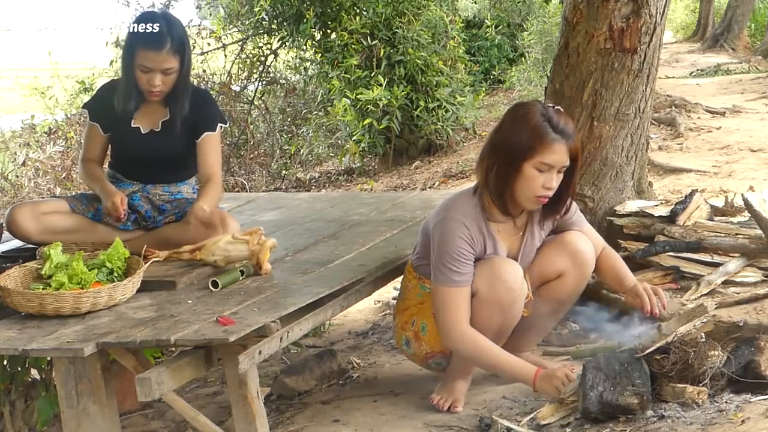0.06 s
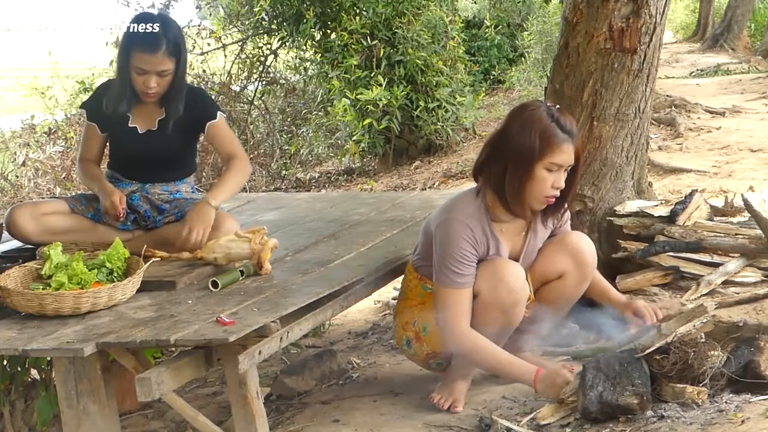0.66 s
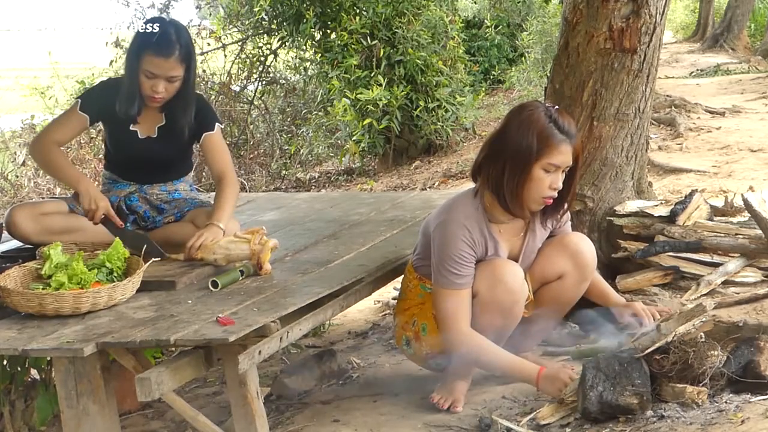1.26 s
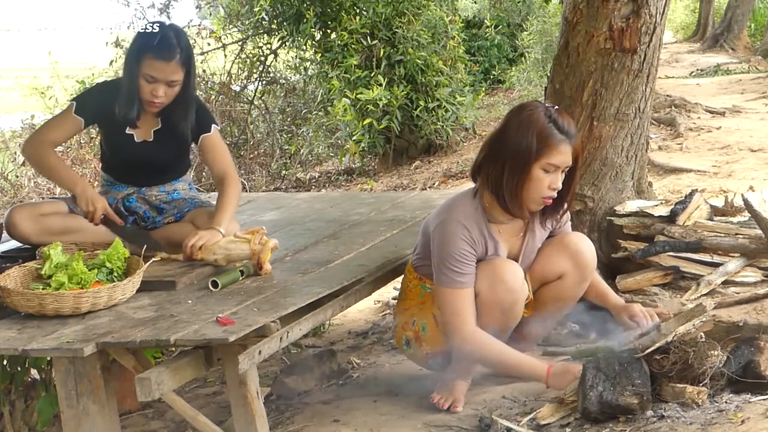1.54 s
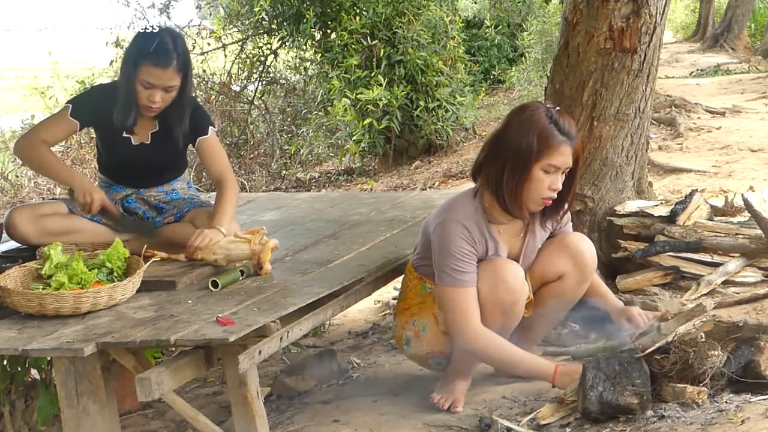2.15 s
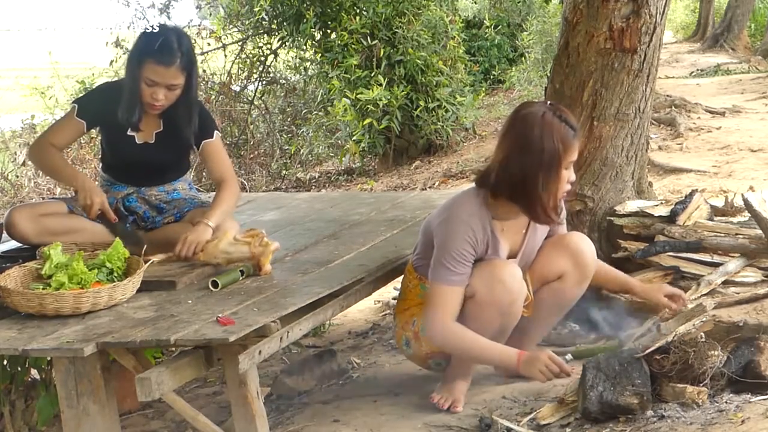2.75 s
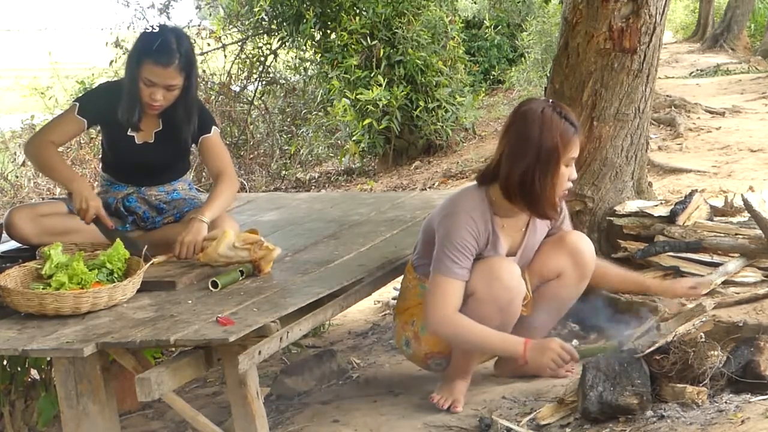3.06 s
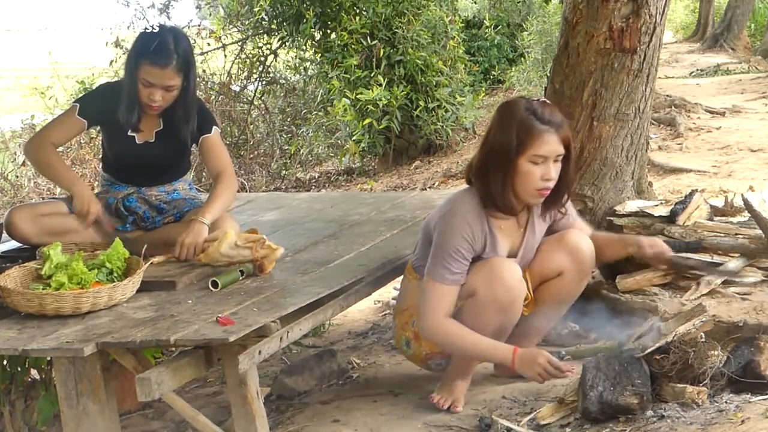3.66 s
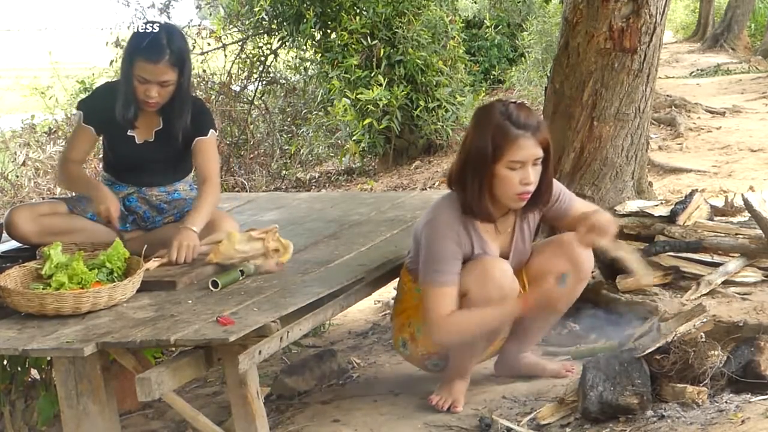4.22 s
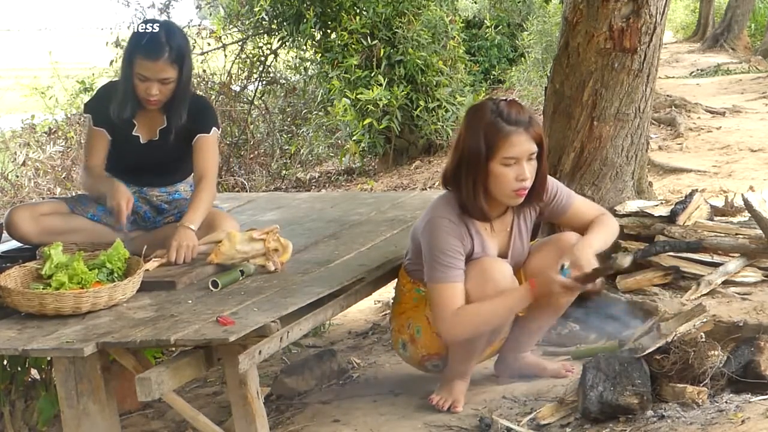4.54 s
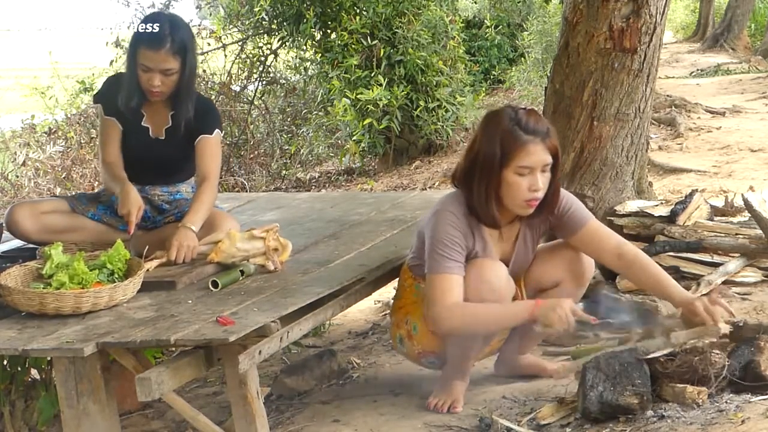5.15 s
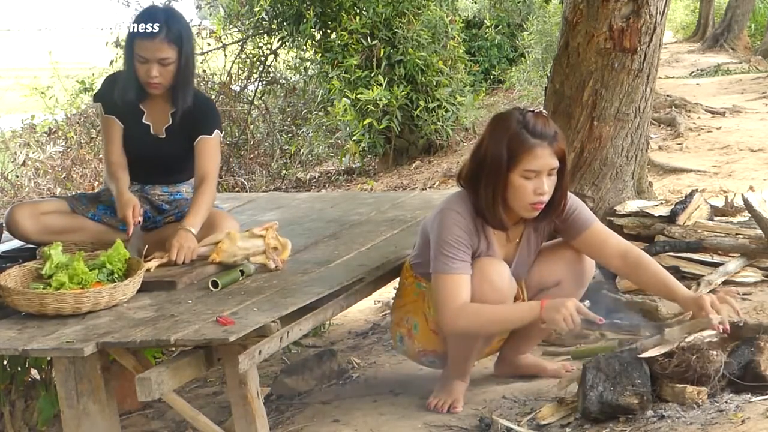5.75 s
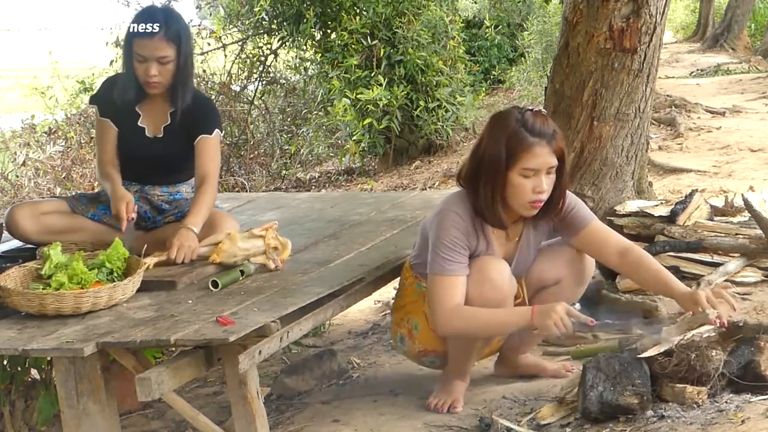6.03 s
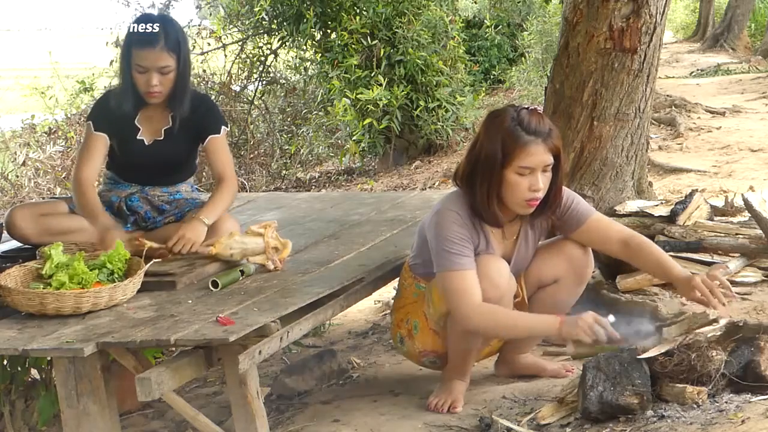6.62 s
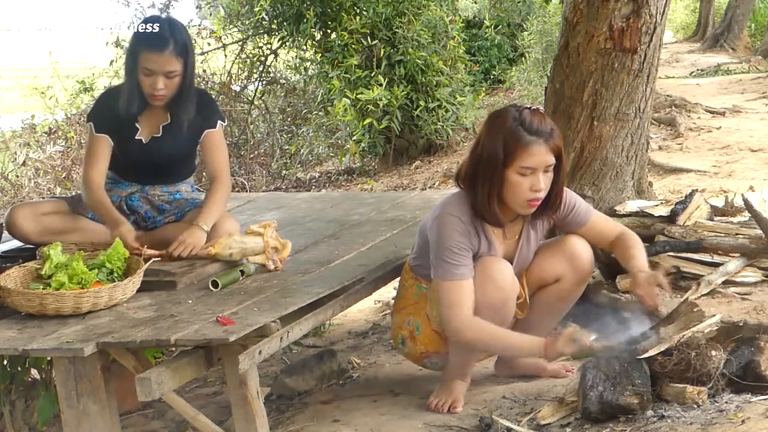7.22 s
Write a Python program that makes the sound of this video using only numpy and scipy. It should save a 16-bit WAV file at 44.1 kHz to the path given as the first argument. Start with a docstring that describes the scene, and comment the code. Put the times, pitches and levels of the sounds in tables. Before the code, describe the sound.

A soft outdoor hiss of leaves runs throughout, with faint insects and small birds chirping far off. Close by, a knife taps lightly on a plank table during the first two seconds, among a few faint scrapes of wood. A hard chop lands at 2 seconds: a steel tick, a wooden thump and rattle, and a short echo. Quick pairs of knocks follow between 3.1 and 3.4 seconds, then another hard chop at 3.7. From about 3.8 to 7 seconds, firewood is dragged and pushed over dry ground in quiet, gritty strokes. A dry stick snaps loudly at 4.3 seconds, with smaller snaps scattered afterwards. The knife strikes hard again at 4.8 seconds and knocks lightly around 5.9. At about 6.6 seconds it is laid down on the wood with a clatter and a brief steel ring, followed by one small knock.

```python
"""A heavy knife chops on a plank table outdoors: irregular knocks, some in quick pairs, then it is
laid down ringing. Each blow is a steel tick, a wooden thump and rattle, and a short echo off the trees.
Beside it firewood is dragged and pushed over dry ground in gritty strokes, and dry sticks snap.
Small birds chirp far off over a soft bed of leaf hiss and insects."""
import sys
import numpy as np
from scipy import signal
from scipy.fft import rfft, irfft, next_fast_len
from scipy.io import wavfile
from scipy.ndimage import uniform_filter1d

SR = 44100
rng = np.random.default_rng(int(sys.argv[2]) if len(sys.argv) > 2 else 0)


def log_audio(samples):
    """Write samples as a 16-bit WAV file to the path given in sys.argv[1]."""
    # one column per channel
    frames = np.atleast_2d(samples).T
    # limit to full scale, then quantise
    limited = np.clip(frames, -1, 1)
    pcm = np.round(limited * 32767).astype(np.int16)
    wavfile.write(sys.argv[1], SR, pcm)


N = 330309
TIME = np.arange(N) / SR
AGE = TIME[:SR // 2]  # time since the onset of a one-shot

# hiss of the leaves: (frequency [Hz], level [dB])
LEAF_HISS = [(20, -35), (45, -25.5), (80, -4.5), (130, -2), (290, -5.5), (450, 2), (600, -5), (1100, -6),
             (2000, -12.5), (3500, -12), (7500, -15.5), (10000, -12.5), (14000, -14), (16000, -19)]
# stereo width of that hiss: (frequency [Hz], side over mid [dB])
LEAF_WIDTH = [(60, -10.5), (150, 7), (400, 6.5), (1500, 2.5), (5000, -7.5), (12000, -4.5)]
# loudness curve of the insects: (time [s], level [dB])
INSECT_LEVELS = [(0, -74.5), (1.0, -71), (2.0, -67.5), (2.6, -86), (6.8, -70.5), (7.49, -70.5)]
# far birds: (time [s], length [s], first pitch [Hz], last pitch [Hz], arch [share of pitch], level [dB])
CHIRPS = [(0.307, 0.058, 3800, 3620, .02, -63), (1.672, 0.23, 3690, 4030, .015, -65.5),
          (2.228, 0.089, 3780, 3750, -.1, -64.5), (2.43, 0.078, 3620, 3120, -.03, -64),
          (2.548, 0.028, 3490, 3140, 0, -62.5), (2.692, 0.029, 3320, 3330, .06, -65),
          (2.81, .15, 3850, 4340, .03, -69), (3.047, 0.057, 3660, 3500, .04, -61),
          (3.169, 0.037, 3260, 3360, .07, -66), (3.22, .021, 3450, 3500, .09, -57.5),
          (3.28, 0.1, 4420, 4200, .04, -64), (3.6, 0.14, 2740, 3430, .01, -68),
          (3.903, 0.13, 3550, 3580, -0.042, -59), (4.152, 0.098, 3490, 2360, -.02, -59),
          (4.992, 0.064, 3100, 2940, .01, -59), (5.283, .22, 2380, 2154, -.04, -60.5),
          (7.23, 0.077, 3650, 3840, .05, -63), (7.365, 0.036, 3620, 2840, .03, -61)]

# knife blows: (time [s], level [dB], pitch of the struck spot [Hz], spot level [dB],
# second resonance [Hz], brightness [dB], steel contact [dB])
KNOCKS = [(.339, -48, 920, -20, 1296, -9, -16), (.742, -61, 1110, -17, 2200, 13, -17),
          (1.295, -48.5, 623, 3, 1180, -7, -19), (1.405, -59, 1072, 0, 2150, 7, -15),
          (1.662, -48, 1053, 2.5, 600, -12, -30), (1.9782, -12.5, 577, -2, 899, -1, -8),
          (3.086, -32.5, 378, 5.5, 653, -19, -8), (3.177, -33, 1121, 2.5, 220, -9, -38),
          (3.346, -21, 532, -3, 1056, -5, -4), (3.438, -29, 1097, 3, 487, -9.5, -38),
          (3.743, -13, 576, 0.5, 1654, 0, -11.5), (4.7951, -16, 920, 3.5, 1561, .5, -19),
          (5.163, -58, 890, 8, 1380, -4, -20), (5.248, -58, 527, 8, 2800, -16, -15),
          (5.614, -53, 455, 3.5, 746, -9, -20), (5.830, -45, 570, 1, 440, -6, -22),
          (5.933, -36.5, 1187, 7.5, 2950, -6, -26), (5.958, -47, 1145, 5, 2710, 0, -25),
          (6.426, -45.5, 976, 0, 2470, 3, -27), (6.441, -49.5, 502, 12, 3350, 9, -10.5),
          (6.581, -18.5, 774, -5.5, 1158, 4.5, -20), (6.771, -37, 799, 0, 955, -32.5, -34)]
# modes of the table top: (frequency [Hz], level [dB], t60 [s])
TABLE_MODES = [(214.6, -26, 0.59), (394, -19, .2), (446, -5, 0.28), (492, -7, 0.18), (548, -10.5, 0.31),
               (580, -10.5, 0.12), (754, -5.5, 0.16), (827, -9, 0.086), (844, 1, 0.15), (989, -4, 0.23),
               (1073, -4, 0.29), (1195, -13, 0.11), (1202, -2, 0.16), (1382, -14.5, 0.076),
               (1617, -10.5, 0.084), (1778, -11.5, 0.28), (2287, -11.5, .11), (3010, -21.5, 0.07),
               (3060, -21, 0.21), (3820, -17.5, 0.16)]
# fibres giving way in the first moment of a blow: (frequency [Hz], level [dB])
FIBRE_CRACK = [(60, -46.5), (200, -18), (500, -3), (1000, -7.5), (1700, -1.5), (2600, -13), (4000, -13.5),
               (8000, -32.5)]
# dense ringing of the loose planks: (frequency [Hz], level [dB], t60 [s])
PLANK_RATTLE = [(40, -37, 0.13), (270, -16, 0.44), (497, 3, 0.14), (1040, 2, 0.16), (1660, -8, 0.14),
                (2300, -15, 0.15), (4040, -21.5, 0.22), (7750, -32.5, 0.39), (14000, -30, 0.23)]
# echo from ground and trees: (frequency [Hz], level [dB], t60 [s])
TREE_ECHO = [(50, -34.5, .4), (210, 1, 0.32), (450, 0.5, 0.15), (1000, 1, 0.39), (2580, -7.5, 0.35),
             (6000, -21.5, 0.65), (14000, -42, 0.14)]
# bright tick of the knife edge, also the colour of splinters: (frequency [Hz], level [dB])
TICK = [(1500, -12.5), (3500, -5), (5500, -5), (8500, -14), (10300, 0.5), (11500, -9.5), (15000, -11.5)]
# modes of the steel blade: (frequency [Hz], level [dB], t60 [s])
BLADE_MODES = [(2326, -5, .19), (2470, -8, .25), (3359, -7, .14), (3780, -10, .3), (4345, -3, .33),
               (4721, -1, .19), (5152, -7, .22), (5685, -1, .2), (5800, -3, .27), (6767, 0, .26),
               (7574, -6, .22), (8274, -8, .32), (8940, -6, .2), (9430, -8, .2), (9523, -4, .21),
               (9930, -4, .2), (10000, -3, .2), (10300, -6, .18), (10438, -3, .2), (12120, -8, .17),
               (12340, -6, .16), (12580, -6, .14), (13194, -8, .22), (14739, -9, .16)]

# pulls and pushes of firewood: (start [s], length [s], level [dB], fine hiss [dB], hollow body [dB])
STROKES = [(0.389, .06, -60, -10, -10.5), (0.937, .12, -60, -3.5, -18), (1.502, 0.052, -57, 2, -16),
           (3.817, 0.58, -61.5, 0, -2.5), (4.244, 0.14, -54.5, 1.5, 6.5), (4.336, .26, -50, -2, -6.5),
           (4.583, 0.41, -56, 3, 0), (4.878, 0.095, -50.5, -4, 1.5), (4.938, 0.51, -52.5, 1.5, 0.5),
           (5.326, 0.24, -61.5, 2.5, -4.5), (5.443, 0.16, -62, 1, -2), (5.712, 0.45, -60, 2, 7),
           (6.42, 0.28, -61, -15, 8), (6.632, 0.4, -63, 5, 1), (6.924, .15, -55.5, 2.5, -6.5)]
# grit under the wood: (frequency [Hz], level [dB])
DRAG_GRIT = [(900, -31.5), (1600, -4), (2300, 2.5), (2700, 1.5), (3200, 3.5), (3700, 0.5), (4500, 0),
             (6000, -1.5), (8000, -13.5)]
# fine hiss of the drag: (frequency [Hz], level [dB])
DRAG_HISS = [(4000, -15), (6000, -1), (7600, -3), (10000, 4), (12000, -0.5), (14500, -0.5), (16000, -0.5)]
# hollow body of the dragged stick: (frequency [Hz], level [dB])
DRAG_BODY = [(30, -48.5), (130, -2), (300, 1), (550, 5.5), (1200, 2), (1600, -1), (2400, -12.5)]
# modes of the dragged stick: (frequency [Hz], level [dB], t60 [s])
STICK_MODES = [(1540, -8, 0.024), (2090, 1, 0.025), (3250, 1, 0.018), (3896, 7, 0.012), (4540, 1, 0.021)]
# dry sticks snapping: (time [s], level [dB], pitch [Hz], t60 [s])
SNAPS = [(4.127, -40.5, 1200, 0.023), (4.287, -30, 1650, .028), (4.2924, -17.5, 870, 0.036),
         (4.2954, -11.5, 1590, 0.0089), (4.636, -38, 1240, 0.034), (5.064, -44.5, 4950, 0.023),
         (5.244, -35.5, 3300, 0.09), (5.997, -41, 1430, 0.06), (6.754, -44, 4360, 0.036)]

# the grip shapes the steel: (tick level [dB], tick t60 [s], blade ring [dB])
GRIPPED = (0, 0.026, -21.5)  # held tight, the edge bites and the blade is damped
LOOSE = (4.1, 0.23, 11.3)  # let go, it chatters on the plank and rings
LET_GO_S = 6.3  # the hand loosens and lays the knife down
PUSH_S, PUSH_DOUBLING_DB = 0.0017, 16.5  # the attack doubles for each such drop in brightness
SPLINTER_DB, SPLINTER_DB_PER_OCTAVE = -35.5, 15.5  # from 1 kHz; thinner, higher sticks splinter more
LEAVES_DB, TOP_HZ = -62, 15500


def undb(db):
    """Decibels to gain."""
    return 10 ** (np.asarray(db) / 20)


def unit(x):
    """Scale to rms 1."""
    return x / np.sqrt(np.mean(x ** 2))


def along(hz, points, values):
    """Join values by straight lines over log frequency."""
    return np.interp(np.log(np.maximum(hz, 1)), np.log(points), values)


def colour(x, spectrum):
    """EQ through points of (frequency [Hz], level [dB])."""
    size = next_fast_len(len(x))
    gain = undb(along(np.fft.rfftfreq(size, 1 / SR), *np.transpose(spectrum)))
    return irfft(rfft(x, size) * gain, size)[:len(x)]


def noise(spectrum, size=N):
    """Coloured noise of rms 1."""
    return unit(colour(rng.standard_normal(size), spectrum))


def fade(t60):
    """A decay of 60 dB in t60 seconds."""
    return np.exp(-np.log(1000) * AGE / max(t60, 1e-3))


def swell(seconds):
    """A smooth attack from silence."""
    return 1 - np.exp(-(AGE / seconds) ** 2)


def drift(rate):
    """Random modulation with a spread near 1, gliding to `rate` new values a second."""
    steps = rng.standard_normal(4096)
    return np.interp(TIME * rate, np.arange(len(steps)), steps)


def ring(modes, scatter_db, detune):
    """Decaying modes; each blow finds them with other strengths and signs."""
    hz, db, t60 = np.transpose(modes)
    strength, shift, sign = rng.standard_normal((3, len(hz)))
    gain = undb(db + scatter_db * strength) * np.sign(sign)
    detuned = hz * (1 + detune * shift)
    waves = (g * np.cos(2 * np.pi * f * AGE) * fade(t) for g, f, t in zip(gain, detuned, t60))
    return sum(waves) / np.sqrt(np.sum(gain ** 2) / 2)


def wash(bands, patchy_db):
    """Countless modes of random phase, bunched into peaks and gaps; each band dies at its own rate."""
    points, db, t60 = np.transpose(bands)
    hz = np.fft.rfftfreq(len(AGE), 1 / SR)
    peaks = unit(signal.fftconvolve(rng.standard_normal(len(hz)), np.hanning(90), "same"))
    bunching = patchy_db * peaks * np.minimum(hz / 1500, 1)
    spectrum = undb(along(hz, points, db) + bunching) * np.exp(2j * np.pi * rng.random(len(hz)))
    parts = [irfft(spectrum * along(hz, points, own), len(AGE)) for own in np.eye(len(points))]
    return sum(p * fade(t) for p, t in zip(parts, t60)) / np.std(sum(parts))


def brighten(x, db, corner_hz=1600):
    """High shelf: a harder contact lifts the treble, a softer one dulls it."""
    low = signal.sosfilt(signal.butter(1, corner_hz, fs=SR, output="sos"), x)
    return low + undb(db) * (x - low)


def radiate(x, corner_hz=180):
    """Low cut: a small body moves little air at low pitch."""
    return signal.sosfilt(signal.butter(1, corner_hz, "high", fs=SR, output="sos"), x)


def stereo(mid, side=0, pan_db=0):
    """Left and right from mid, side and a lean to the left."""
    return np.array([(mid + side) * undb(pan_db / 2), (mid - side) * undb(-pan_db / 2)])


def add(out, s, sound):
    """Mix a stereo sound in at s seconds."""
    start = max(int(s * SR), 0)
    out[:, start:start + sound.shape[1]] += sound[:, :N - start]


def leaves():
    """A soft, wide bed of leaf hiss that wavers a little."""
    mid, side = (noise(LEAF_HISS) * undb(.5 * drift(3) + .5 * drift(12)) for _ in range(2))
    return undb(LEAVES_DB) * stereo(mid, colour(side, LEAF_WIDTH))


def insects():
    """A thin, high band of insect buzz that flutters as it swells and sinks."""
    band = [(8000, -35.5), (9200, -4.5), (9600, 1.0), (10100, -8.0), (11500, -34.5)]
    mid, side = noise(band), noise(band)
    level_db = np.interp(TIME, *np.transpose(INSECT_LEVELS)) + 1.5 * drift(12)
    return stereo(mid, .5 * side) * undb(level_db)


def birds():
    """Warbling whistles that glide in an arch or a dip, smeared by the foliage."""
    out = np.zeros((2, N))
    for s, length, first_hz, last_hz, arch, db in CHIRPS:
        progress = np.minimum(AGE / length, 1)
        hump = np.sin(np.pi * progress)
        glide = first_hz + (last_hz - first_hz) * progress
        waver = 0.021 * unit(uniform_filter1d(rng.standard_normal(len(AGE)), size=300))
        warble = .035 * np.sin(2 * np.pi * (rng.uniform(25, 45) * AGE + rng.random()))
        hz = glide * (1 + arch * hump + waver + warble)
        note = np.sin(2 * np.pi * np.cumsum(hz) / SR) * hump
        foliage = rng.standard_normal((2, len(AGE))) * fade(0.18)
        smear = signal.fftconvolve(note[None], foliage / np.linalg.norm(foliage[0]))[:, :len(AGE)]
        add(out, s, undb(db) * (note + smear))
    return out


def steel_contact(tick_db, tick_t60, blade_db):
    """The edge ticks against the wood and sets the blade ringing."""
    tick = undb(tick_db) * noise(TICK, size=len(AGE)) * fade(tick_t60) * swell(0.0015)
    blade, blade_side = (undb(blade_db) * ring(BLADE_MODES, scatter_db=2, detune=.0005) * swell(.002)
                         for _ in range(2))
    return stereo(tick + blade, undb(-12.5) * blade_side, pan_db=-4)


def table_thump(spot_hz, spot_db, second_hz, bright_db):
    """Fibres crack, the struck spot thumps, the top rings and the loose planks rattle."""
    # the spot swings hard for a few cycles, then rings on weakly
    spot = undb(spot_db) * np.sin(2 * np.pi * spot_hz * AGE) * (1.4 * fade(0.038) + 0.34 * fade(0.18))
    # its second resonance is a close cluster that beats
    cluster = [(second_hz * .95, -4, .06), (second_hz, 0, .11), (second_hz * 1.06, -4, .06)]
    second = undb(-6.5) * ring(cluster, scatter_db=3, detune=.003)
    top = undb(-7) * ring(TABLE_MODES, scatter_db=-1, detune=0.0013)
    crack = noise(FIBRE_CRACK, size=len(AGE)) * fade(0.022)
    rattle = undb(-3) * wash(PLANK_RATTLE, patchy_db=4)
    attack_s = PUSH_S * 2 ** (-bright_db / PUSH_DOUBLING_DB)  # a duller blow pushes longer
    return radiate((crack + spot + second + top + rattle) * swell(attack_s))


def tree_echo():
    """Ground and trees scatter a blow into a short, diffuse tail."""
    return wash(TREE_ECHO, patchy_db=3) * swell(0.011)


def knife_knocks():
    """Each blow layers steel, wood and echo; the steel rings out once the hand lets go."""
    out = np.zeros((2, N))
    for s, db, spot_hz, spot_db, second_hz, bright_db, steel_db in KNOCKS:
        thump = table_thump(spot_hz, spot_db, second_hz, bright_db)
        body = stereo(thump + undb(-17.5) * tree_echo(), undb(-24) * tree_echo(), pan_db=2.1)
        body = brighten(brighten(body, bright_db / 2), bright_db / 2)
        grip = GRIPPED if s < LET_GO_S else LOOSE
        add(out, s - .001, undb(db + steel_db) * steel_contact(*grip))  # just ahead of the thump
        add(out, s, undb(db) * body)
    return out


def stroke(start, length, steepness=3.2):
    """The hand speeds up and slows to rest; the rubbing follows its speed."""
    off_middle = np.abs(TIME - start - length / 2) / (0.28 * length)
    return 1 / (1 + off_middle ** steepness)


def firewood_drag():
    """Wood drags over grit and dry leaves: uneven grains, a fine hiss and the stick's hollow body."""
    envelopes = sum(np.outer(undb([db, db + hiss_db, db + body_db]), stroke(s, length))
                    for s, length, db, hiss_db, body_db in STROKES)
    catching_db = 1.9 * drift(60)  # shared by all three layers
    gains = [envelope * undb(catching_db + 1.2 * drift(45)) for envelope in envelopes]
    out = np.zeros((2, N))
    for spectrum, gain in zip((DRAG_GRIT, DRAG_HISS, DRAG_BODY), gains):
        grains = rng.standard_normal((2, N)) * undb(3.07 * rng.exponential(size=(2, N)))
        mid, side = (unit(colour(g, spectrum)) for g in grains)
        out += stereo(mid, undb(-11) * side, pan_db=0.5) * gain
    # about 110 times a second the wood catches on a coarse grain and rings
    catches = (rng.random(N) < 110 / SR) * rng.standard_normal(N)
    rasp = unit(signal.fftconvolve(catches, ring(STICK_MODES, scatter_db=0, detune=0.013))[:N])
    return out + stereo(undb(-13) * rasp * gains[0])  # rides the grit's envelope


def stick_snaps():
    """A breaking stick swings briefly at its pitch, with a crack and a spray of splinters."""
    out = np.zeros((2, N))
    for s, db, hz, t60 in SNAPS:
        swing = 1.02 * np.sin(2 * np.pi * hz * AGE) * fade(t60 / 2)
        crack = 0.6 * noise([(hz / 8, -12), (hz, 0), (hz * 3, -15), (hz * 9, -34)], size=len(AGE))
        splinter_db = SPLINTER_DB + SPLINTER_DB_PER_OCTAVE * np.log2(hz / 1000)
        splinters = undb(splinter_db) * noise(TICK, size=len(AGE))
        snap = (swing + (crack + splinters) * fade(t60)) * swell(t60 / 45)
        add(out, s, undb(db) * stereo(radiate(snap), pan_db=-2.5))
    return out


def scene():
    """Knife and firewood up front; birds, leaves and insects behind."""
    return knife_knocks() + stick_snaps() + firewood_drag() + birds() + leaves() + insects()


def record(dry):
    """A steep low-pass trims the very top of the mix."""
    return signal.sosfilt(signal.ellip(8, .2, 70, TOP_HZ, fs=SR, output="sos"), dry)


dry = scene()
out = record(dry)
log_audio(out)
```